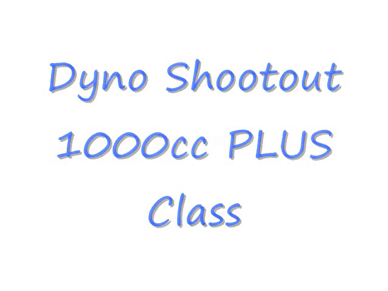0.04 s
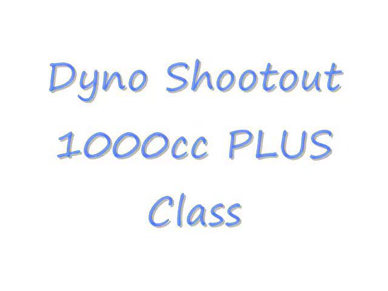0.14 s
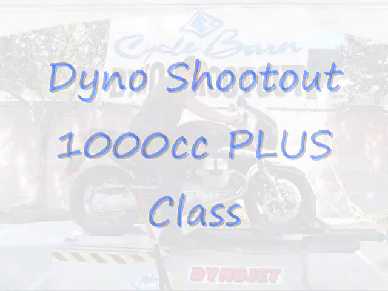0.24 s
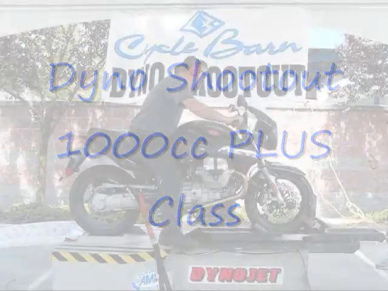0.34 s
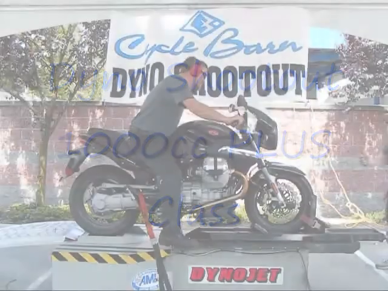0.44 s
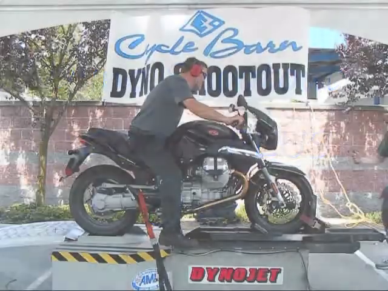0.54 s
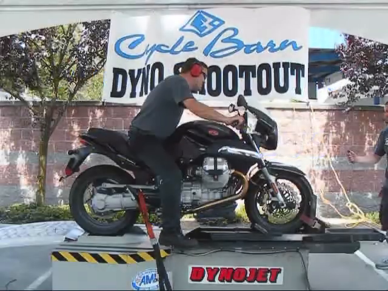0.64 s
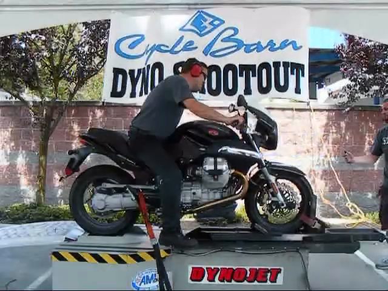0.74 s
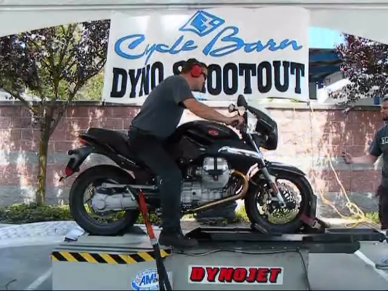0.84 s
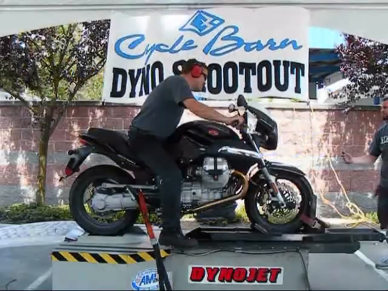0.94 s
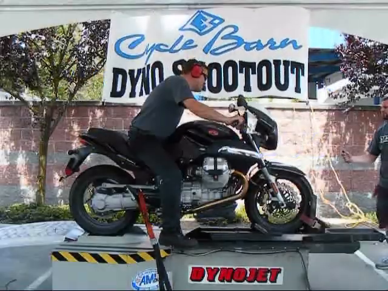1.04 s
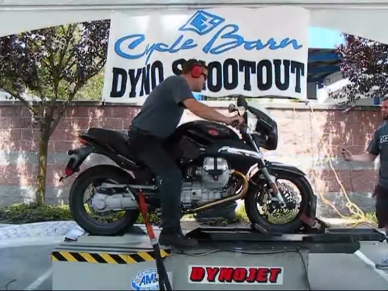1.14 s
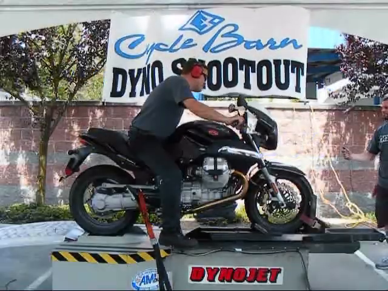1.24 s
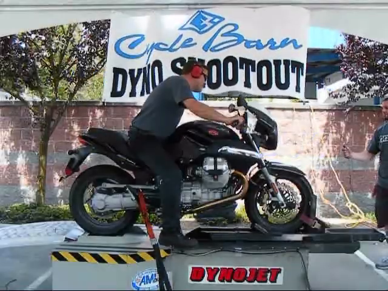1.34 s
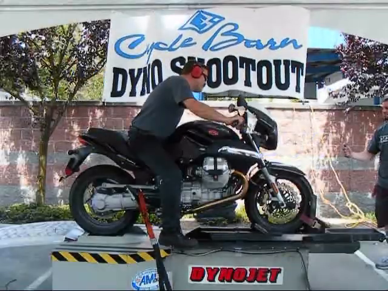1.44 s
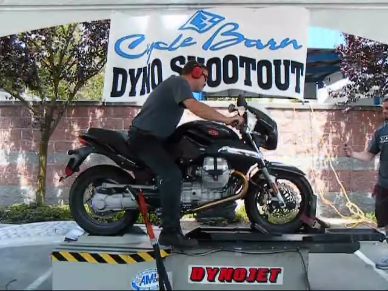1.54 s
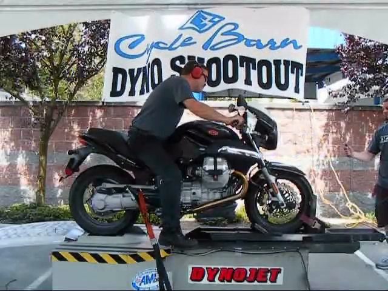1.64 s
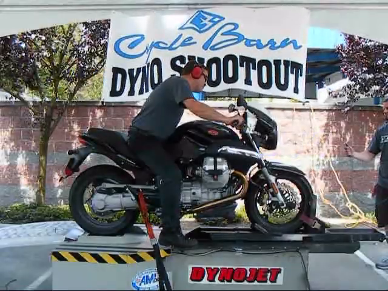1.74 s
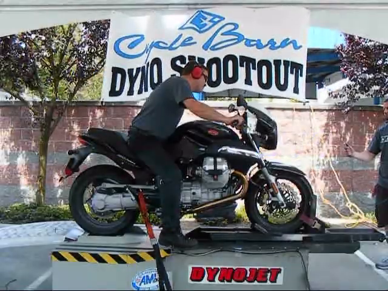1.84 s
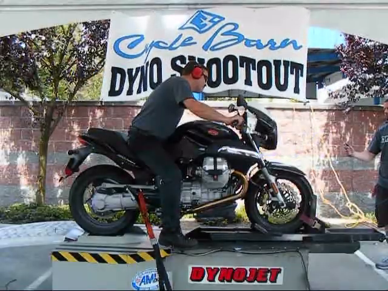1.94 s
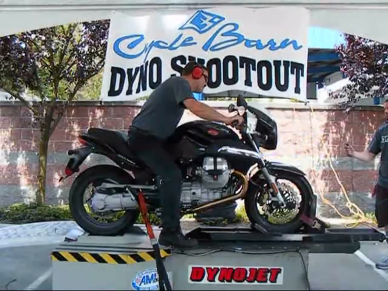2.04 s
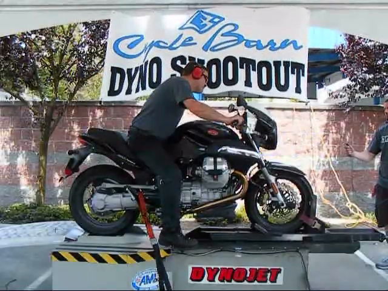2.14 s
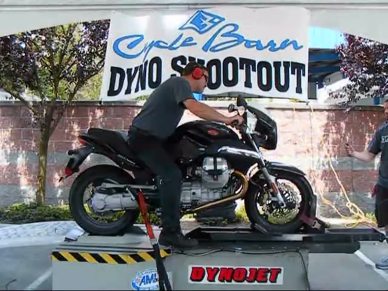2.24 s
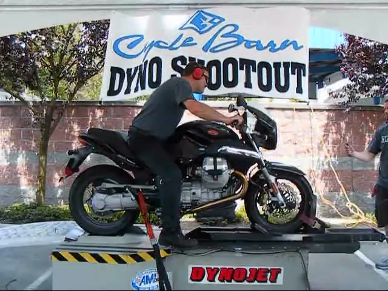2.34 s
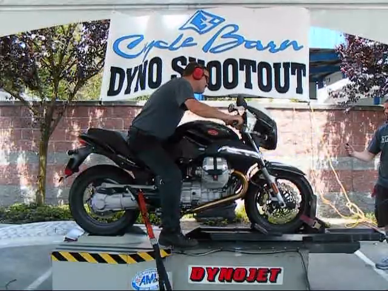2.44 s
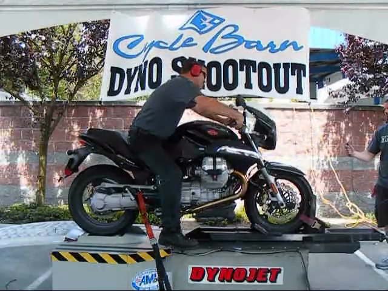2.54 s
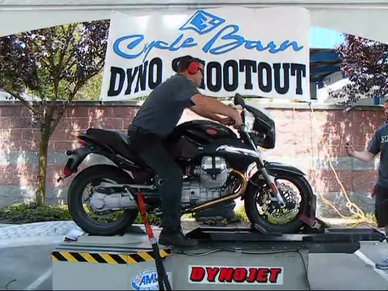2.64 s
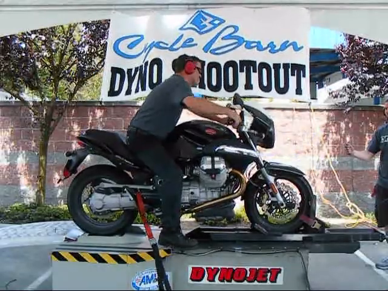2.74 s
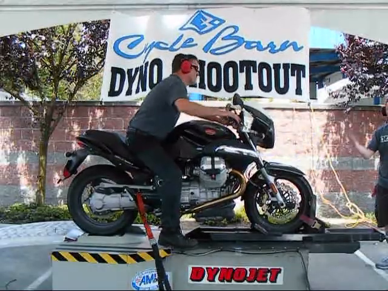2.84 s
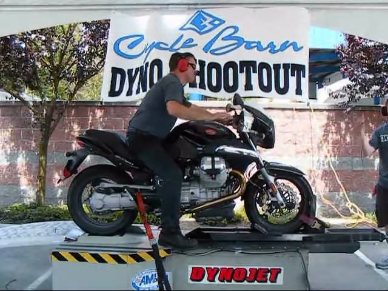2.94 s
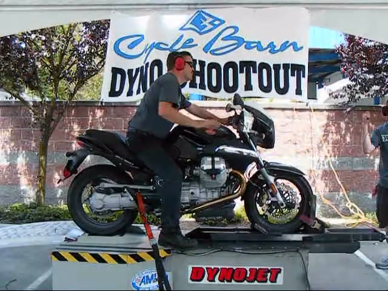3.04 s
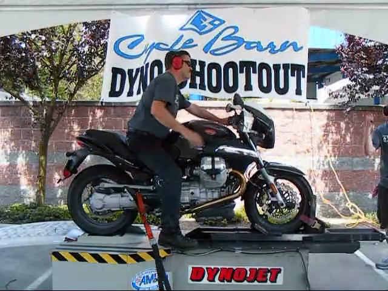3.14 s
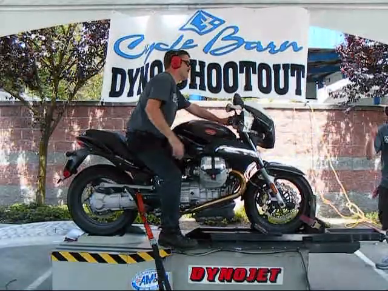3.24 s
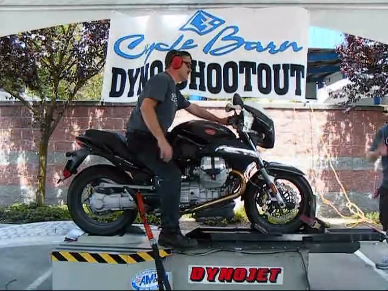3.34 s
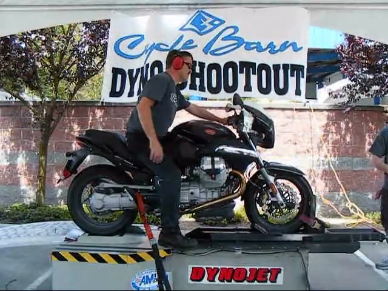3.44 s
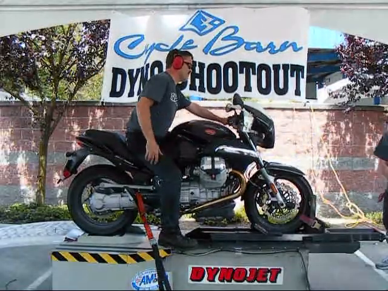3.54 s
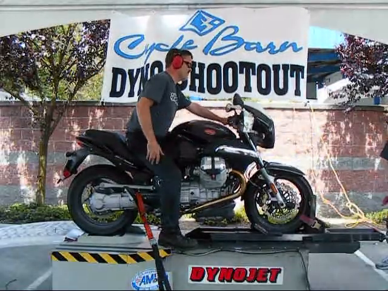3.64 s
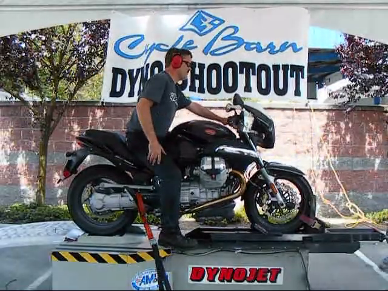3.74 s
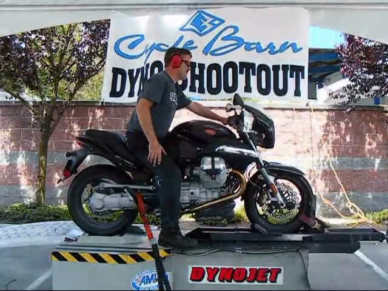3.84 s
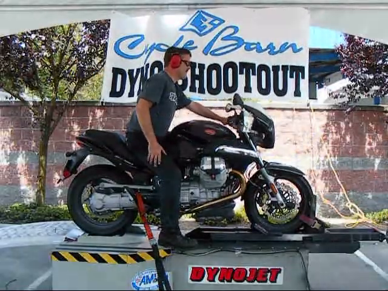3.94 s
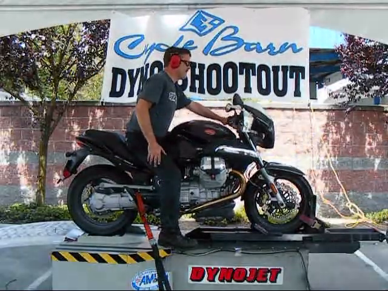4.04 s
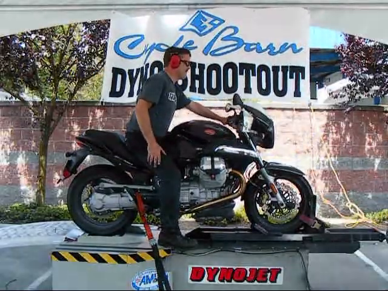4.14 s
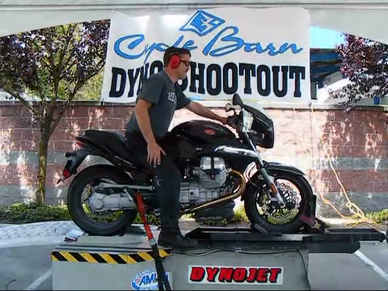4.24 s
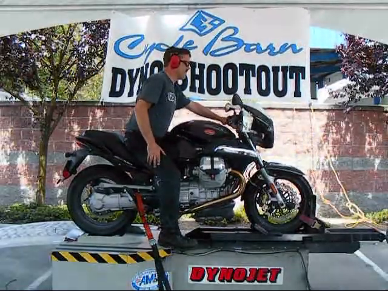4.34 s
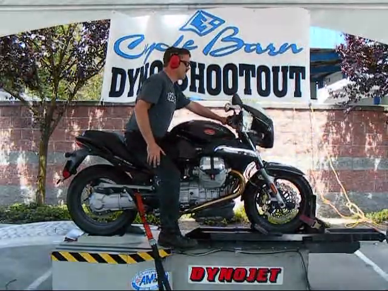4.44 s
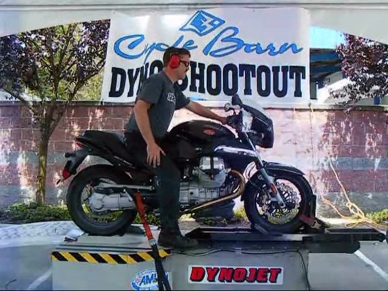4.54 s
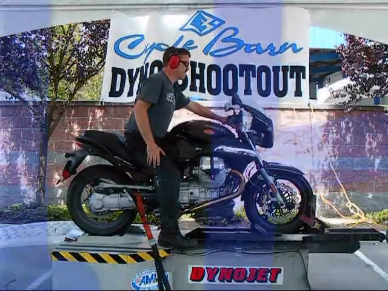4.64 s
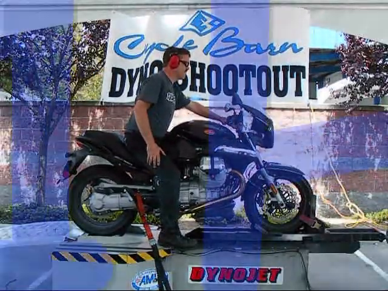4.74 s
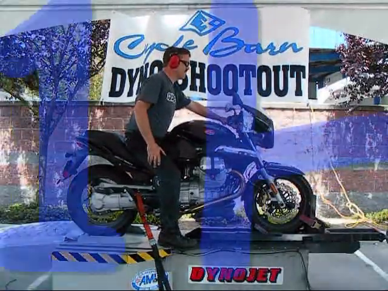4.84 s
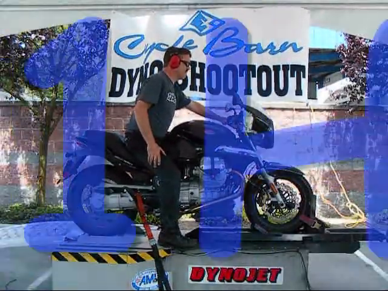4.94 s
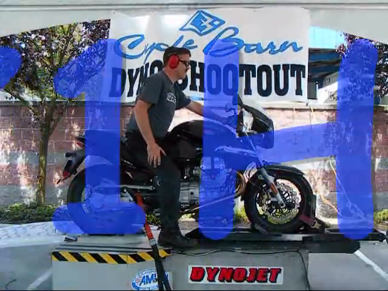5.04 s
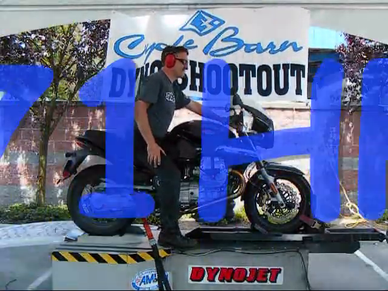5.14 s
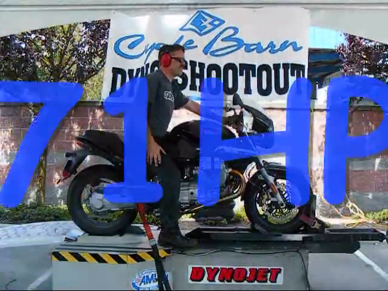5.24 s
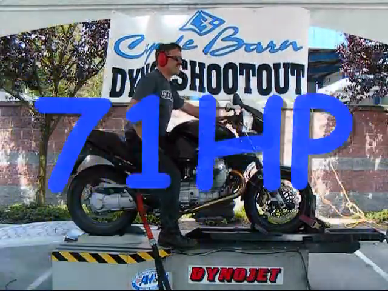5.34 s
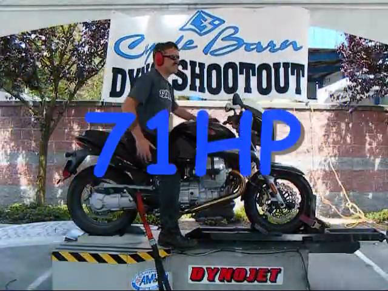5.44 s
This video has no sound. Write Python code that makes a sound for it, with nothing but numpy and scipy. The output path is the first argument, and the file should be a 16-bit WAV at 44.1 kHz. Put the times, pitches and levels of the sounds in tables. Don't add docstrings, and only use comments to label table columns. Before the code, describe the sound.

After a brief silence, a large twin-cylinder motorcycle at full throttle fades in on an outdoor roller stand, its raspy roar climbing until about 2.7 seconds. The throttle shuts, the pitch falls quickly, and a thin tyre-on-roller whine is exposed. A cough pops while coasting, the engine lugs low, then a blip brings more coughs and a held, uneven growl. Close small camera microphone, distorted and dull on top.

```python
import sys
import numpy as np
from scipy import signal
from scipy.fft import rfft, irfft
from scipy.io import wavfile
from scipy.ndimage import uniform_filter1d

SR = 44100
rng = np.random.default_rng(int(sys.argv[2]) if len(sys.argv) > 2 else 0)


def waveform_to_disk(signal):
    frames = np.transpose(np.atleast_2d(signal))
    scaled = np.clip(frames, -1, 1) * 32767
    samples = np.round(scaled).astype(np.int16)
    wavfile.write(sys.argv[1], SR, samples)


N = 242550
SECOND_FIRING = .375
TRACK_TOP_HZ = 5300


def undb(db):
    return np.exp(np.asarray(db) * (np.log(10) / 20))


def unit(x):
    return x / np.sqrt(np.mean(x ** 2))


def columns(table):
    s, *rest = np.transpose(table)
    return [np.interp(np.arange(N) / SR, s, c) for c in rest]


def colour(x, points, size=8192):
    hz, db = np.transpose(points)
    log_hz = np.log(np.fft.rfftfreq(size, 1 / SR) + 1)
    log_gain = np.interp(log_hz, np.log(hz), db) * np.log(10) / 20
    cepstrum = irfft(log_gain)
    cepstrum[1:size // 2] *= 2
    cepstrum[size // 2 + 1:] = 0
    return signal.fftconvolve(x, irfft(np.exp(rfft(cepstrum))))[:N]


def ring(x, hz, width):
    return signal.lfilter(*signal.iirpeak(hz, hz / width, fs=SR), x)


def walk(rate):
    k = int(SR / rate)
    held = np.repeat(rng.standard_normal(N // k + 1), k)
    return uniform_filter1d(uniform_filter1d(held, k), k)[:N]


def tone(turns, db, flutter_db, flutter_rate):
    gain = np.sqrt(2) * undb(db + flutter_db * walk(flutter_rate))
    return gain * np.sin(2 * np.pi * (turns + rng.random()))


def swells(hz, places):
    return sum(db * np.exp(-((hz - f) / width) ** 2) for f, width, db in places)


def own(table, k):
    return [row[1:] for row in table if round(row[0]) == k]


# multiple, level in dB throttle open, level in dB shut.
LOW_MULTIPLES = [(2, -31.5, -32), (3, -24.5, -23), (4, -30.5, -31), (5, -10.5, -24), (6, -15, -28)]
# multiple, centre in Hz, width in Hz, gain in dB.
PIPES_LOADED = [(2, 120, 4, -8), (2, 136, 9, 11.5), (3, 178, 8, -3), (3, 205, 8, 2.5), (4, 198, 8, -12),
                (4, 230, 3, -9), (4, 256.5, 3, -14), (4, 270, 6, 10.5), (5, 237, 5, -9), (5, 266, 12, 3.5),
                (5, 283, 4.5, -9), (5, 293, 4, 1.5), (5, 305, 4, -3.5), (5, 324, 7, -3.5), (5, 341, 7, 4),
                (6, 285, 4, -6), (6, 316, 16, -8.5), (6, 332, 4, -20), (6, 366, 7, -3.5),
                (6, 375.5, 3.5, -22), (6, 389, 6, 3.5), (6, 410, 3, -6)]
# centre in Hz, width in Hz, gain in dB.
PIPES_COASTING = [(67.6, 32, -6.5), (103, 6.9, 4), (122.6, 3.7, -13.5), (202.7, 17, -15.5), (268, 7.6, 8),
                  (296, 9.7, -11), (308, 34, -20.5)]


def low_multiples(hz, turns, throttle, uneven_db, lug_db):
    out = tone(turns, -52.5, 1.1, 8.1)
    for multiple, open_db, shut_db in LOW_MULTIPLES:
        k = round(multiple)
        loaded = open_db + swells(k * hz, own(PIPES_LOADED, k))
        coasting = shut_db + lug_db + swells(k * hz, PIPES_COASTING)
        db = throttle * loaded + (1 - throttle) * coasting
        out = out + tone(k * turns, db, .3 * uneven_db, 15)
    return out


# centre in Hz, width in Hz, level in dB.
PIPE = [(242, 9.8, -6.5), (352.5, 31, -6.5), (404.5, 10, -12.5), (451.5, 29, -10), (513.8, 39, -16.5),
        (564.8, 26, -14.5), (584.5, 9.5, -16), (678.4, 49, -13.5), (759, 22, -21.5), (854.6, 35, -16.5),
        (944.7, 11, -18), (1099, 18, -17), (1285, 71, -17.5), (1390, 55, -16), (1552, 100, -18.5),
        (1755, 69, -14), (1906, 77, -14), (2007.5, 41.5, -14.5), (2129, 49, -16), (2260, 26, -14),
        (2455, 120, -23), (2660, 16, -15.5), (2923, 260, -25.5), (3067, 52, -22), (3159, 20, -23.5),
        (3328, 110, -26), (3805, 180, -32)]


def upper_multiples(hz, turns, uneven_db, second=.6):
    grid = np.arange(5500.)
    pipe = np.sqrt(sum(undb(2 * db) / (1 + (2 * (grid - f) / w) ** 4) for f, w, db in PIPE))
    out = 0
    for k in range(7, 76):
        twin = np.abs(1 + second * np.exp(-2j * np.pi * k * SECOND_FIRING))
        out = out + twin * np.interp(k * hz, grid, pipe) * tone(k * turns, 0, uneven_db, 25)
    return out


# frequency in Hz, level in dB per Hz.
GAS_OPEN = [(20, -22.5), (80, -17), (150, -8.5), (330, -4.5), (500, -2.5), (1200, -2.5), (2000, -1.5),
            (3200, -7.5), (4200, -18.5), (5300, -28), (7000, -63.5)]
# frequency in Hz, level in dB per Hz.
GAS_SHUT = [(20, -46.5), (45, -29.5), (130, -0.5), (300, -3.5), (700, -6), (1300, -8), (2100, -6),
            (3100, -10), (3800, -15.5), (4200, -22), (4700, -22.5), (5300, -40), (7000, -81.5)]


def gas_roar(turns, throttle, lug_db):
    first_puff = np.exp(-(turns % 1) / .15)
    second_puff = np.exp(-((turns - SECOND_FIRING) % 1) / .076)
    puff = unit(1.7 + first_puff + second_puff)
    wide_open = colour(puff * rng.standard_normal(N), GAS_OPEN)
    wide_open = unit(wide_open + .47 * ring(wide_open, 1970., 250.))
    shut = colour(puff * rng.standard_normal(N), GAS_SHUT)
    shut = unit(shut + .1 * ring(shut, 1400., 240.) + 1.3 * ring(shut, 350., 19.))
    gas = undb(-4.3) * throttle * wide_open + undb(-2 + .4 * lug_db) * (1 - throttle) * shut
    return undb(1.6 * walk(25)) * gas


def stand_rumble(hz):
    db = np.maximum(-15 - .6356 * (hz - 27), -22.5)
    rumble = ring(ring(rng.standard_normal(N), 60., 50.), 60., 50.)
    return undb(db - 8) * unit(rumble)


# time in seconds, engine cycle rate in Hz.
SPEED = [(.34, 47.55), (.71, 51.5), (1.4, 58.5), (1.91, 63.1), (2.14, 65.1), (2.42, 67.4), (2.7, 69.2),
         (2.75, 66.7), (3.1, 53.9), (3.37, 45.2), (3.56, 40.3), (3.96, 30), (4.13, 26.9), (4.28, 26.3),
         (4.48, 30.9), (4.68, 38.7), (4.82, 45), (5.5, 43.7)]
# time in seconds, level in dB.
ROAR = [(.3, -13.5), (.9, -17), (1.4, -15), (1.66, -13), (2.69, -13.5), (2.78, -16), (3.5, -16),
        (4.13, -15.5), (4.55, -16), (5.05, -16), (5.1, -18.5), (5.16, -16.5), (5.5, -16.5)]
# time in seconds, upper multiples in dB over the roar,
# unevenness of the firings in dB, throttle from 0 to 1.
LOAD = [
    (.3, -4, 2.5, 1),
    (2.69, -3.5, 2.5, 1),
    (2.735, -7, 3, 0),
    (3.3, -7, 3.5, 0),
    (3.7, -12, 4, 0),
    (4.3, -12, 4, 0),
    (4.6, -7.5, 4, 0),
    (5.5, -8, 4, 0),
]


def engine():
    (hz,), (roar_db,) = columns(SPEED), columns(ROAR)
    ladder_db, uneven_db, throttle = columns(LOAD)
    turns = np.cumsum(hz) / SR
    lug_db = swells(hz, [(26, 3.5, -6)])
    low = low_multiples(hz, turns, throttle, uneven_db, lug_db)
    ladder = undb(ladder_db + 3.2) * upper_multiples(hz, turns, uneven_db)
    noise = gas_roar(turns, throttle, lug_db) + stand_rumble(hz)
    return low + undb(roar_db) * (ladder + noise)


# time in seconds, tooth rate in Hz.
ROLLER_HZ = [(2.6, 366), (3.06, 363), (3.4, 361), (3.74, 358.5), (4.08, 355.3), (4.3, 351), (4.45, 346.5),
             (4.7, 338.5), (5.0, 333), (5.2, 330.5), (5.5, 328.5)]
# multiple of the tooth rate, level in dB.
ROLLER_STRONG = [(2, -26.5), (3, -35.5), (4, -30.5), (6, -32)]
# multiple of the tooth rate, level in dB over the mean of the strong ones.
ROLLER_REST = [(1, -8), (2.76, -8), (5, -14.5), (7, -10.5), (8, -6), (9, -9.5), (10, -13.5)]
# multiple, centre in Hz, width in Hz, gain in dB.
STAND = [(2, 712, 9, 9), (2, 699, 6, 12), (2, 672, 9, -9), (2, 655, 4, 12), (3, 1075, 12, 12),
         (3, 1030, 16, 9), (4, 1442, 3, 6), (4, 1427, 8, 9.5), (4, 1381, 13, 10.5), (4, 1342, 9, 9),
         (4, 1321, 4, 11), (6, 2158, 7, 11), (6, 2146, 3, -8), (6, 2135, 7, 10), (6, 2098, 16, 12.5),
         (6, 2045, 14, 6), (6, 1984, 5, 4)]


def roller():
    hz, = columns(ROLLER_HZ)
    turns = np.cumsum(hz * (1 + .0009 * walk(15))) / SR
    levels = {}
    for multiple, db in ROLLER_STRONG:
        k = round(multiple)
        levels[k] = db + swells(k * hz, own(STAND, k))
    mean_db = np.mean(list(levels.values()), axis=0)
    strong = sum(tone(k * turns, db, 1.0, 20) for k, db in levels.items())
    rest = sum(tone(k * turns, mean_db + db, 3.4, 6.1) for k, db in ROLLER_REST)
    bared = np.clip((np.arange(N) / SR - 2.62) / .24, 0, 1)
    return bared * (strong + rest)


# start in seconds, peak level in dB, centre in Hz.
BACKFIRES = [
    (3.4206, -11.5, 1850),
    (4.488, -10.5, 1900),
    (4.6279, -6.5, 1900),
    (4.8394, -14, 1860),
]


def backfires():
    kicks = np.zeros(N)
    t = np.arange(SR // 20) / SR
    swell = t / .008 * np.exp(1 - t / .008)
    for s, db, hz in BACKFIRES:
        cough = swell * unit(ring(rng.standard_normal(len(t)), hz, 300.))
        start = int(s * SR)
        kicks[start:start + len(t)] += undb(db - 9) * cough
    return kicks


def scene():
    return (engine() + roller() + backfires())[None]


def thin_treble(x, from_hz=3300., step_db=-40.5, wander_db=3.5, size=4096):
    hz, _, frames = signal.stft(x, SR, nperseg=size)
    power = np.abs(frames) ** 2
    treble = np.sqrt(np.sum(power[(hz > 800) & (hz < 4000)], axis=0))
    loud = np.sqrt(np.sum(power, axis=0))
    wander = np.repeat(rng.standard_normal((size // 16 + 1, len(treble))), 12, axis=0)[:len(hz)]
    spared_db = -9 * (loud / loud.max()) ** 3
    step = treble * undb(step_db + spared_db + wander_db * wander)
    frames *= (np.abs(frames) > step) | (hz[:, None] < from_hz)
    return signal.istft(frames, SR, nperseg=size)[1][:N]


def fizz(clicks):
    size = int(.05 * SR)
    treble = signal.butter(8, [TRACK_TOP_HZ, 15500], "band", fs=SR, output="sos")
    energy = signal.sosfilt(treble, clicks) ** 2
    energy = uniform_filter1d(uniform_filter1d(energy, size), size // 2)
    dull = signal.lfilter([1], [1, -.6], rng.standard_normal(N))
    return undb(-7) * np.sqrt(np.abs(energy)) * unit(signal.sosfilt(treble, dull))


def band_limit(x):
    return signal.sosfilt(signal.butter(12, 15700, fs=SR, output="sos"), x)


def record(dry):
    x = undb(1.1) * dry[0]
    x = x / (1 + np.abs(x / 1.06) ** 6) ** (1 / 6)
    x = signal.sosfilt(signal.ellip(10, .3, 100, TRACK_TOP_HZ, fs=SR, output="sos"), x)
    x = thin_treble(x) - .007
    flat = np.clip(x, -.98, .98)
    fade_start_s, fade_length_s, pictures_per_s = .3335, 1.92, 29.97
    since = np.arange(N) / SR - fade_start_s
    picture = np.ceil(since * pictures_per_s)
    stairs = np.clip((picture - .4) / pictures_per_s / fade_length_s, 0, 1)
    mix = stairs * (flat + fizz(x - flat))
    return band_limit(mix[None])


dry = scene()
out = record(dry)
waveform_to_disk(out)
```